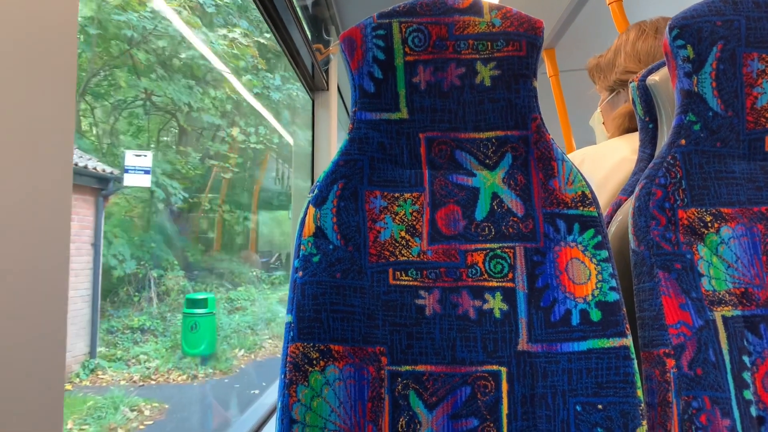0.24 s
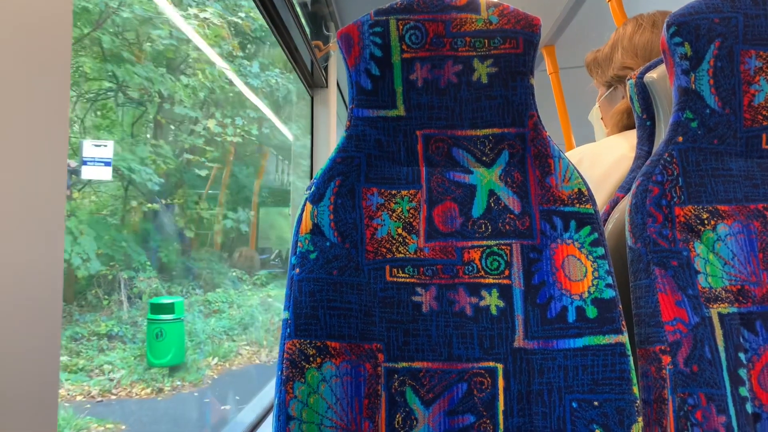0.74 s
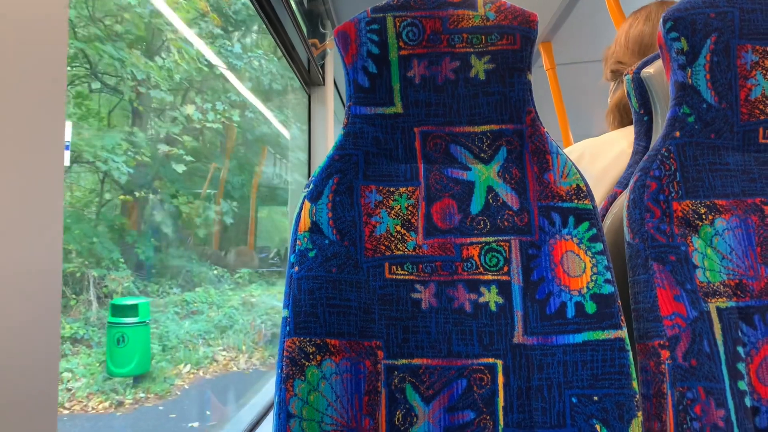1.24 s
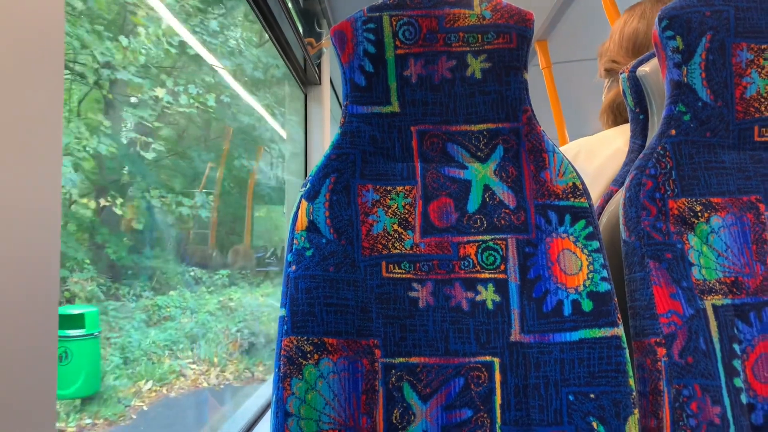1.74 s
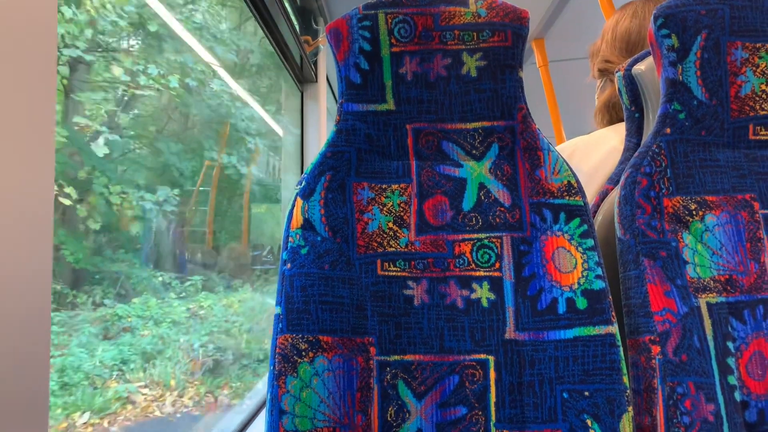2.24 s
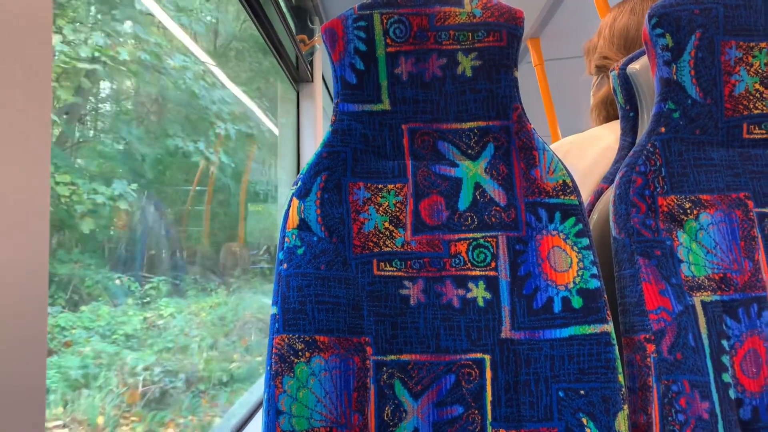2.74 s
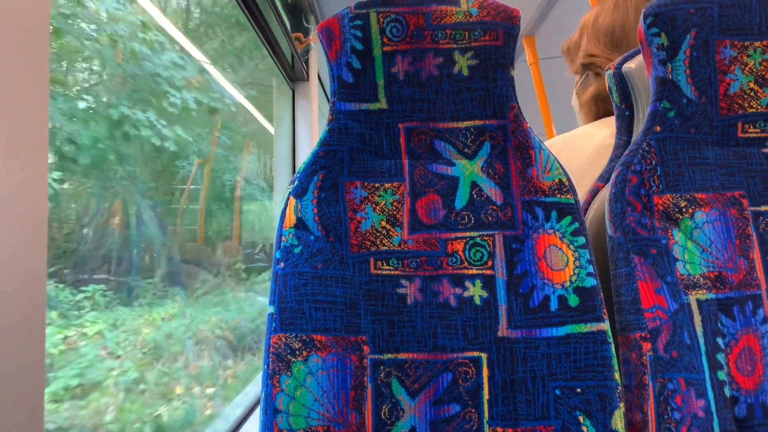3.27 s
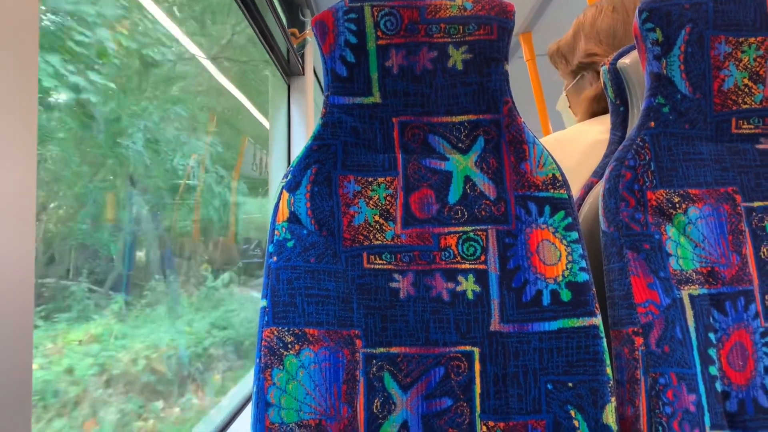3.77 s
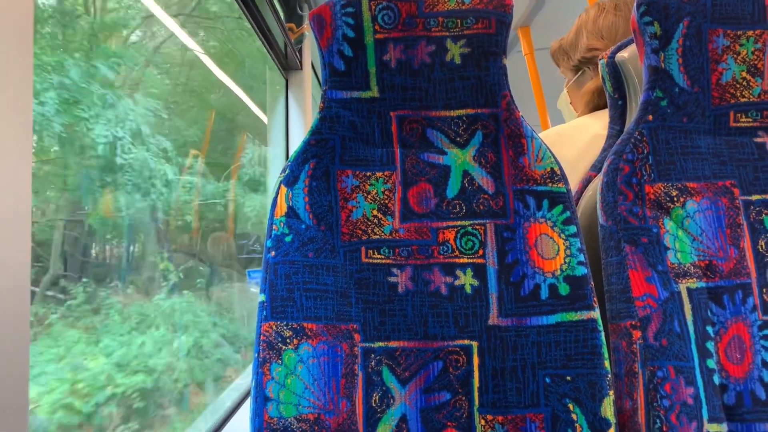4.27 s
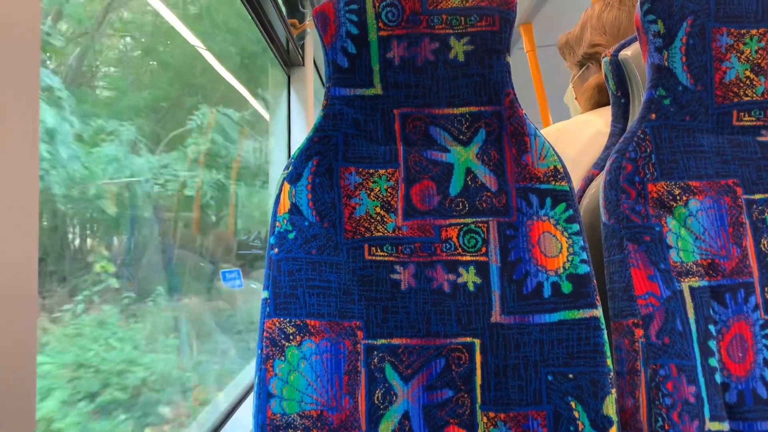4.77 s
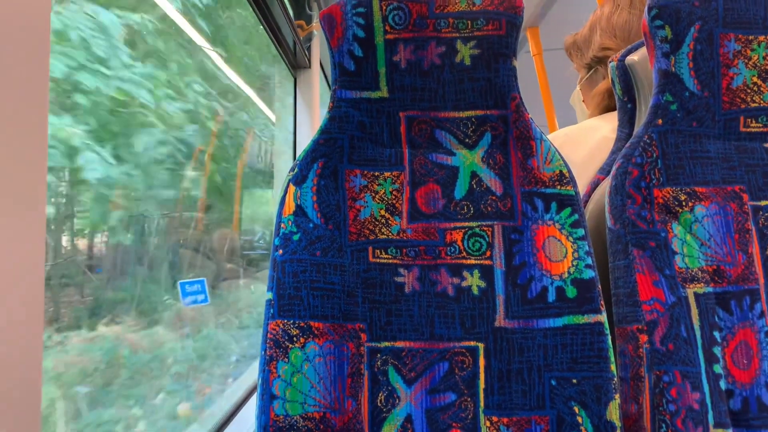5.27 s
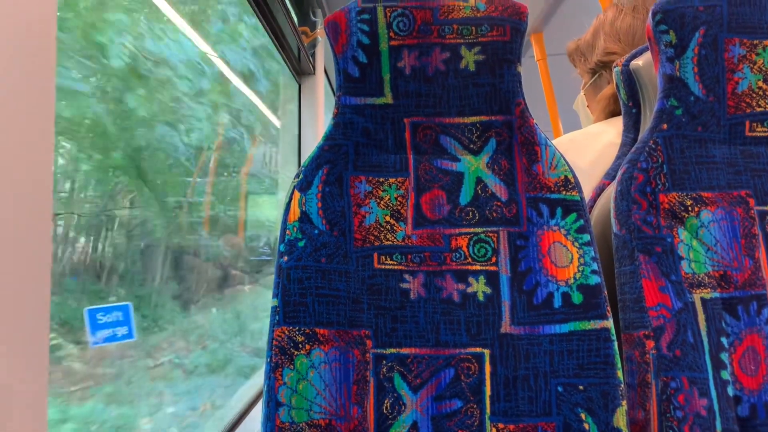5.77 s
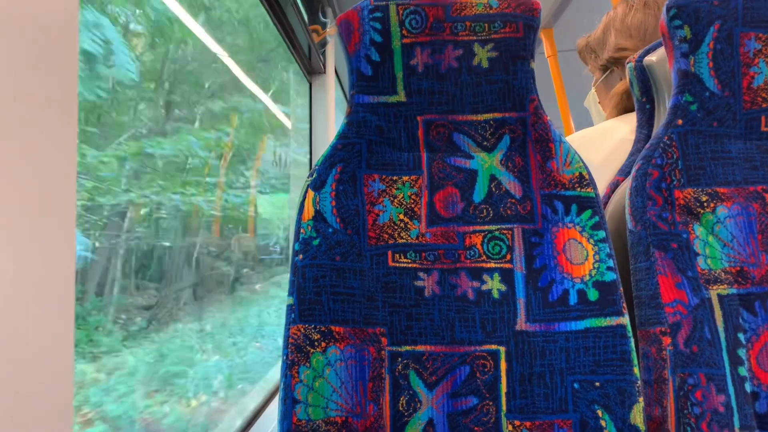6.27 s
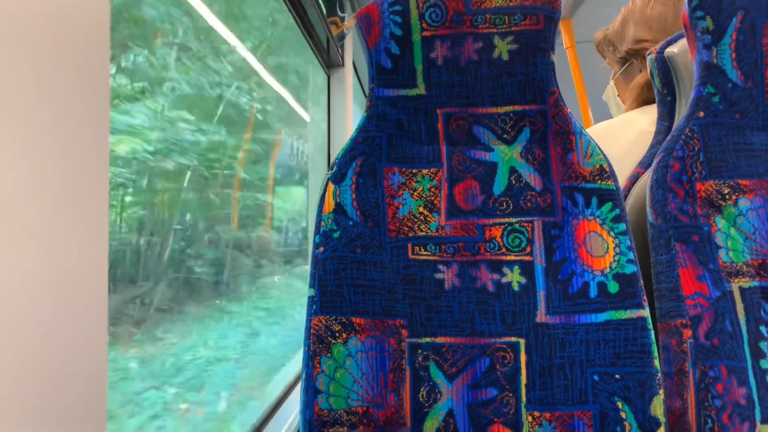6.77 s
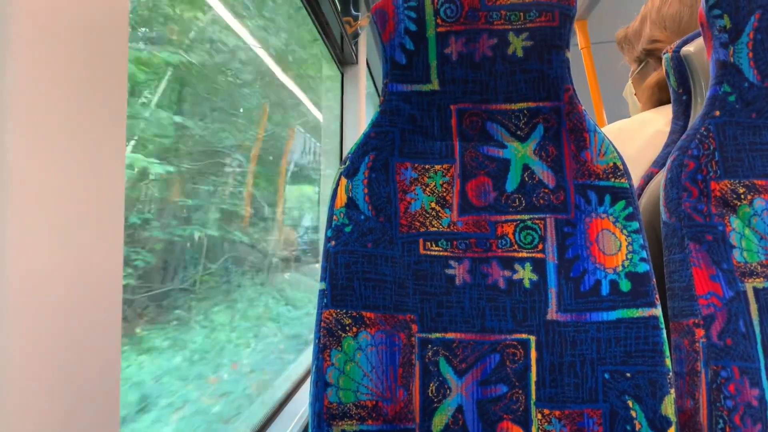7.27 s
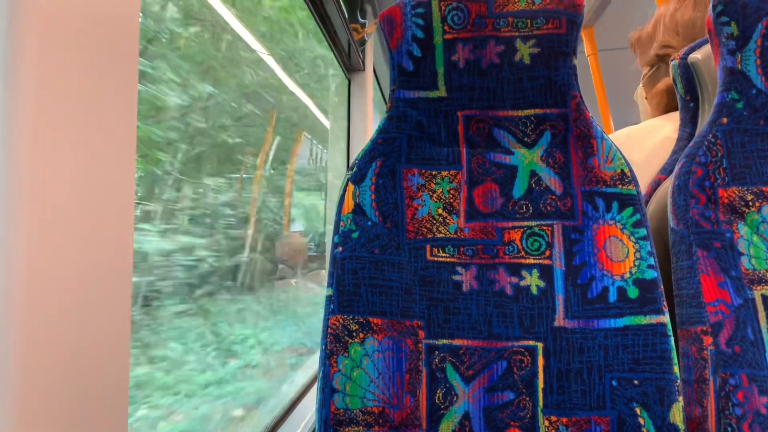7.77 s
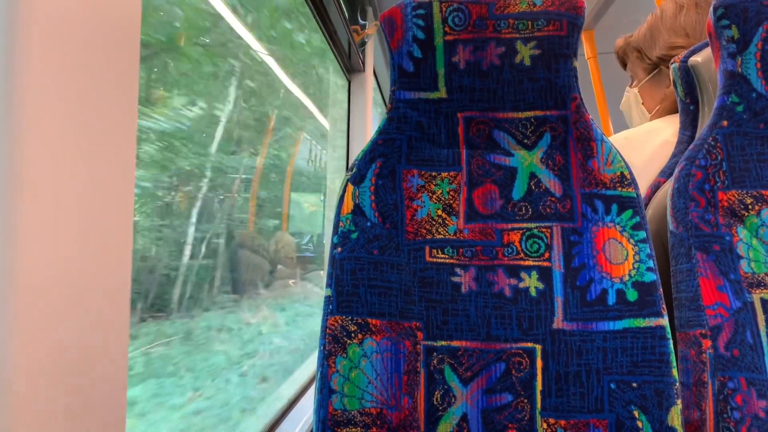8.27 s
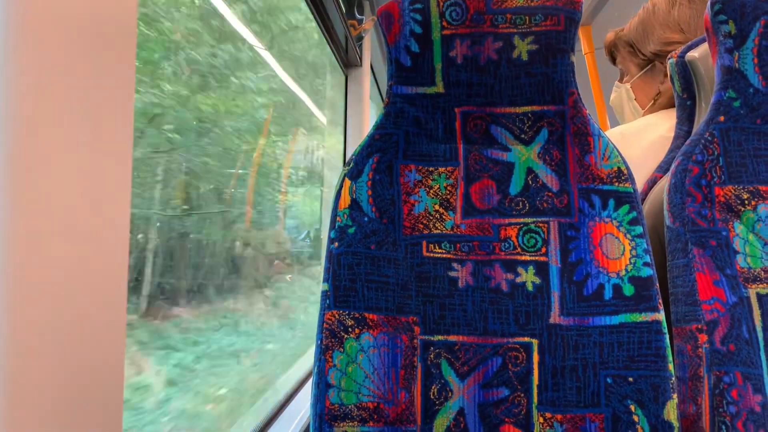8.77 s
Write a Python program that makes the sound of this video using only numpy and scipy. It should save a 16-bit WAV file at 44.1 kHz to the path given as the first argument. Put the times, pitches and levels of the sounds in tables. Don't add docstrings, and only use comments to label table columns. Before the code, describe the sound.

Inside a moving bus, a spaced stereo pair picks up a deep diesel boom and broad body rumble throughout. The engine starts low and slow, dips slightly by 0.8 seconds, then revs climb strongly to about 3.3 as the bus pulls away. From 1.7 to 3.2 a compressor hums harder and puffs bright air. Revs fall at a gear change near 4, rise modestly to 5.3, sag until 6.3, climb to 8.3, then drop before the end. Panels ring, fittings chatter and dry plastic knocks cluster around 0.7-1.4, 2-2.4 and 3-3.8, with the sharpest near 3.6; later ones are sparse. Tyre roar grows until about 5, while axle whine slides upward. Thin whistling leaks pulse with the engine, stronger after 3. A faint steady blower flutters above, and gear whine appears briefly near 3 and around 7-8.3.

```python
import sys
import numpy as np
from scipy import signal
from scipy.fft import rfft, irfft
from scipy.io import wavfile
from scipy.ndimage import uniform_filter1d, map_coordinates

SR = 44100
rng = np.random.default_rng(int(sys.argv[2]) if len(sys.argv) > 2 else 0)


def nominal_scale(level):
    x = np.asarray(level, float) / 20
    return 10 ** x


def store_wav(level_fs):
    pcm = np.round(np.clip(np.atleast_2d(level_fs), -1, 1) * 32767)
    wavfile.write(sys.argv[1], SR, pcm.T.astype(np.int16))


N = 397782
TIME_S = np.arange(N) / SR
HZ = np.arange(N // 2 + 1) * SR / N


def in_time(rows):
    s, *columns = np.transpose(rows)
    return [np.interp(TIME_S, s, c) for c in columns]


def at_hz(points):
    hz, db = np.transpose(points)
    return np.interp(np.log(HZ + 1), np.log(hz), db)


def rms_one(x):
    return x / np.sqrt(np.mean(x ** 2) + 1e-20)


def drift(rate_hz):
    knots = rng.standard_normal(int(N / SR * rate_hz * 2) + 3)
    return map_coordinates(knots, [TIME_S * rate_hz * 2], order=3)


# pitch_hz, likeness (0 to 1)
LIKENESS = [(60, .96), (170, .72), (340, .6), (520, .4), (1000, .15), (1600, .62), (2050, .32), (2400, .6),
            (3100, .3), (4000, .1), (4700, .34), (6300, .2), (7400, .62), (8800, .96)]


def noise(gain, low_hz, high_hz):
    alike = np.clip(at_hz(LIKENESS), 0, 1)
    mid, side = rfft(rng.standard_normal((2, N))) * gain
    pair = np.sqrt(1 + alike) * mid + np.sqrt(1 - alike) * side * [[1], [-1]]
    inside = (HZ > low_hz) & (HZ < high_hz)
    return irfft(pair, N) * N / np.sqrt(np.sum(abs(pair[:, inside]) ** 2))


def peaks(modes, at=HZ):
    power = 0
    for hz, width_hz, db in modes:
        power = power + nominal_scale(db) ** 2 / (1 + (2 * (at - hz) / width_hz) ** 2) ** 2
    return np.sqrt(power)


def tone(cycles, level_db, wobble_db, wander):
    level = np.sqrt(2) * nominal_scale(level_db + wobble_db * drift(7))
    return -level * np.cos(2 * np.pi * cycles + wander * drift(4))


def strikes(cycles, fall):
    size = nominal_scale(0.83 * rng.standard_normal(400))[cycles.astype(int) % 400]
    return size * np.exp(-fall * (cycles % 1))


def pulsing(cycles, depth, steady):
    swell = np.exp(depth * (np.cos(2 * np.pi * cycles) - 1)) * nominal_scale(1.5 * drift(12))
    steady = np.clip(steady, 0, 1)
    return rms_one(swell) * (1 - steady) + steady


# time_s, firings_per_s
SPEED = [(0.0, 23.2), (0.8, 22.1), (1.14, 27.3), (1.86, 44.3), (2.42, 47.5), (2.98, 57.2), (3.33, 58.8),
         (3.93, 46.4), (4.24, 44.7), (4.76, 46.4), (5.29, 50.9), (5.68, 49.1), (6.3, 44.3), (7.51, 52.4),
         (8.29, 56.5), (8.57, 52.2), (8.89, 45.6), (9.02, 45.1)]


def engine_speed():
    return in_time(SPEED)[0]


def revs_octaves(speed):
    return np.log2(speed / 48)


# time_s, effort_db, firing_pulse_sharpness_db, mount_shake_db
THROTTLE = [(0, -3.5, -3.5, -20), (.5, -4.5, -2.5, 4), (1.0, -4.5, 0.5, -1), (1.4, -4, 0, 1.5),
            (1.75, -0.5, -2, -2), (2.2, 2, 0.5, -11), (2.7, -3.5, 0.5, 3.5), (3.1, 2, 2, -5),
            (3.7, 1, -2.5, 0.5), (4.3, 1, -3, -4), (5.0, 0.5, -2, 1.5), (5.5, -0.5, -3, 2.5),
            (6.2, 0, -0.5, -1.5), (6.8, -2, -5.5, 4), (7.3, 0, 6, 2), (7.8, -0.5, 5, -0.5),
            (8.3, 1, -8, -2.5), (9.02, 3, -7, -2)]


def throttle():
    return in_time(THROTTLE)


def layer_db(full_db, effort_share, db_per_octave, speed):
    return full_db + effort_share * throttle()[0] + db_per_octave * revs_octaves(speed)


# pitch_hz, gain_db
CABIN = [(22, -14), (35, -1), (45, 0.5), (58, -1), (70, 1.5), (85, 0.5), (100, 0.5), (170, 0)]


def cabin_db(order_hz):
    hz, db = np.transpose(CABIN)
    return throttle()[0] + np.interp(np.log(order_hz), np.log(hz), db)


# multiple_of_firing, level_db, rise_to_cruise_db_per_octave, sharpness_share, shake_share
MAIN_ORDERS = [
    (1, -19.5, 12, 0.11, -0.29),
    (2, -19.5, 9.5, .01, 1.0),
    (3, -27, -6.5, 1.0, 0.071),
]


def firing_boom(speed, firings):
    _, sharp_db, shake_db = throttle()
    below = np.minimum(revs_octaves(speed), 0)
    slip_db = np.interp(TIME_S, [2.8, 2.95], [-5.5, 0])
    out = 0
    for k, db, rise, sharp_share, shake_share in MAIN_ORDERS:
        level_db = db + cabin_db(k * speed) + rise * below + slip_db * (k == 1)
        level_db = level_db + sharp_share * sharp_db + shake_share * shake_db
        uneven = nominal_scale(1.5 * drift(18))
        out = out + uneven * tone(k * firings, level_db, wobble_db=2.0, wander=0.23)
    return out


# multiple_of_firing,
# level_over_rumble_db
MINOR_ORDERS = [(.5, -4), (1.25, -51), (1.5, -10.5), (1.75, -44), (2.25, 1), (2.5, 1), (2.75, -14.5),
                (3.3, -5.5), (4.0, -11), (4.5, -8.5), (4.75, -2), (5.0, -5.5), (5.5, -8), (6.0, -5),
                (9.0, -3), (10.001, -3.5), (11.0, -4)]
# pitch_hz, width_hz, level_db
BODY = [(72, 41, -6), (145, 65, -6), (260, 41, -5), (488.3, 60, -16)]
# time_s, load_db
IN_GEAR = [(0, -15), (3.3, -5), (4.3, 3.2), (7.3, 2.5), (8.0, -4), (8.7, -3), (9.02, 6)]


def weaker_orders(speed, firings, rumble_db):
    load_db, = in_time(IN_GEAR)
    out = 0
    for k, db in MINOR_ORDERS:
        level_db = db + rumble_db + load_db * (k > 8)
        out = out + peaks(BODY, k * speed) * tone(k * firings, level_db, wobble_db=3.0, wander=0.73)
    return out


COMPRESSOR_ORDER = 1.65


def charging(early_s=0):
    return np.interp(TIME_S, [1.66, 1.7, 3.1 - early_s, 3.3 - early_s], [0, 1, 1, 0])


def compressor_hum(speed, firings):
    below = np.minimum(revs_octaves(speed), 0)
    level_db = -30 + 8.5 * charging(early_s=.3) + cabin_db(COMPRESSOR_ORDER * speed) + 8 * below
    return tone(COMPRESSOR_ORDER * firings, level_db, wobble_db=2.2, wander=0.12)


# pitch_hz, level_db_per_hz
RUMBLE = [(12, -20), (24, -9.5), (55, -5.5), (80, 0), (128, -3.5), (198, -6), (256, -6.5), (279, -14.5),
          (326, -23), (420, -21.5), (550, -29.5), (920, -120)]


def body_rumble(rumble_db):
    return nominal_scale(rumble_db - 2.0 + 1.32 * drift(5.4)) * noise(nominal_scale(at_hz(RUMBLE)), 121, 330)


# pitch_hz, width_hz, level_db
BODY_RING = [(259, 35.6, -19), (485, 52, -36.5), (824, 37, -35.5), (721, 22, -38.5), (1970, 270, -55.5)]


def ringing_panels(speed, rumble_db):
    firings_per_s2 = uniform_filter1d(np.gradient(speed) * SR, size=9000)
    return nominal_scale(rumble_db - 8.0 + 0.0786 * firings_per_s2) * noise(peaks(BODY_RING), 180, 330)


# pitch_hz, level_db_per_hz
CLATTER = [(180, -31), (300, -0.5), (397, -8.5), (499, -8.5), (641, -13), (704, -12), (885, -16),
           (1200, -13), (1410, -15), (1950, -17), (2160, -26), (2400, -20.5), (2690, -27.5), (3600, -32),
           (4680, -71), (7920, -120)]


def cabin_clatter(clatter_db, combustion):
    level = nominal_scale(clatter_db - 3.0 + 1.58 * drift(9))
    return level * combustion * noise(nominal_scale(at_hz(CLATTER)), 240, 3500)


# pitch_hz, level_db_per_hz
HISS = [(2500, 4), (3200, -0.5), (5000, -4.5), (7300, -9), (9000, -13), (11000, -18.5), (14000, -32.5),
        (16000, -24)]


def engine_hiss(hiss_db, combustion):
    return nominal_scale(hiss_db - 1.0 + 0.97 * drift(14)) * combustion * noise(nominal_scale(at_hz(HISS)), 2730, 6800)


def tyre_roar():
    pace = np.clip(TIME_S / 5.2, .05, 1)
    floor_pan = [(556, 400, -38.5)]  # pitch_hz, width_hz, level_db
    return nominal_scale(-38.5 + 5.5 * np.log2(pace) + 1.0 * drift(5)) * noise(peaks(floor_pan), 300, 1200)


# pitch_hz, width_hz, level_db
AXLE_RING = [(428, 14, -48), (470, 14, -38), (530, 24, -34), (584, 40, -39.5), (705, 50, -49)]


def axle_whine():
    pitch_hz = 410 + 73 * (TIME_S - 4.6)
    return peaks(AXLE_RING, pitch_hz) * tone(np.cumsum(pitch_hz) / SR, 3 * drift(25), wobble_db=1.5, wander=2.2)


# time_s, pitch_hz, level_db
FAN = [(0, 2442, -54), (3.0, 2442, -52), (4.95, 2446, -49.5), (5.2, 2465, -56), (6.5, 2468, -58),
       (8.3, 2472, -57), (9.02, 2470, -62)]


def blower():
    pitch_hz, db = in_time(FAN)
    cycles = np.cumsum(pitch_hz + 16 * drift(35)) / SR
    return tone(cycles, db + 4 * drift(40), wobble_db=1.1, wander=.8)


# time_s, level_db
BOOST = [(0.0, -67), (0.38, -80), (1.81, -58), (1.93, -60), (2.26, -52.5), (2.86, -49.5), (3.94, -57.5),
         (4.57, -57.5), (5.12, -50.5), (5.75, -51), (6.71, -56.5), (7.56, -55.5), (7.84, -52.5),
         (9.02, -55)]


def over_pressure_db():
    return in_time(BOOST)[0] + 55


# pitch_hz, level_db_per_hz
LOW_LEAK = [(7500, -19.5), (8300, -13), (9500, -9), (11500, 2.5), (12800, -9), (13500, -22)]
# pitch_hz, width_hz, level_db
WHISTLES = [(8730, 40, -4), (9440, 80, -1), (9860, 40, 3), (10300, 45, 11), (10590, 60, 5), (11400, 70, 5)]


def low_leak(firings, over_db):
    level_db = over_db - 55 + 1.5 * np.minimum(over_db, 0)
    steady = np.clip(.68 + .02 * (over_db - 5), .1, 1)
    whistling = nominal_scale(at_hz(LOW_LEAK)) + peaks(WHISTLES)
    air = pulsing(firings / 4 - 3 / 4, .9, steady) * noise(whistling, 8300, 10900)
    return nominal_scale(level_db + 0.4) * (1 - charging()) * air


# pitch_hz, level_db_per_hz
HIGH_LEAK = [(11500, -30), (12400, -3), (13000, -1), (14000, -3), (14700, -1), (15250, -6), (15600, -19)]


def high_leak(firings, over_db):
    level_db = -54.5 + .9 * (over_db - 1) + .3 * (TIME_S - 4.5)
    depth = np.clip(.8 - .06 * over_db, .45, .85)
    air = pulsing(firings / 4 - 9 / 32, depth, .42) * noise(nominal_scale(at_hz(HIGH_LEAK)), 12400, 15500)
    return nominal_scale(level_db) * (1 - .6 * charging()) * air


def rattles(clatter_db):
    jolts_per_s, t60_s, count = 420, .1, 48
    pitches_hz = np.geomspace(600, 6500, count) * rng.uniform(.97, 1.03, count)
    jolts = (rng.random(N) < jolts_per_s / SR) * nominal_scale(np.clip(2 * rng.standard_normal(N), -3, 3))
    dealt = rng.integers(0, count, N)
    sides_db = rng.uniform(-6, 6, count)
    decay, soft = nominal_scale(-60 / (t60_s * SR)), np.hanning(600) / 300
    shaking = drift(9)
    out = np.zeros((2, N))
    for k, hz in enumerate(pitches_hz):
        hits = signal.oaconvolve(jolts * (dealt == k), soft)[:N]
        swell = signal.lfilter([1], [1, -decay], hits + 1e-18)
        colour_db = np.interp(np.log(hz), np.log([600, 1200, 2400, 3600, 6500]), [-1.5, -5, -10, -14.5, -26])
        sway_s = .0004 * np.roll(shaking, k * 7001)
        ring = swell * np.sin(2 * np.pi * hz * (TIME_S + sway_s))
        out += nominal_scale(colour_db + sides_db[k] * np.array([[1], [-1]])) * ring
    return nominal_scale(clatter_db - 9.5) * rms_one(out)


# time_s, peak_db, low_part_db
KNOCKS = [(0.6853, -40.5, 5), (0.7205, -40.5, 4.5), (0.815, -41.5, 9.5), (1.1794, -51.5, 14),
          (1.2331, -41, 6), (1.2753, -42.5, 8), (1.3374, -36.5, 4), (1.4396, -31, 3.5), (2.0703, -36, -6),
          (2.1194, -38.5, 7), (2.431, -38.5, 7), (3.0152, -38.5, 8), (3.045, -47, 14), (3.072, -49.5, 11.5),
          (3.1145, -36.5, 9), (3.5074, -44.5, 13), (3.5779, -28, -3), (3.676, -33, 4), (3.7694, -29.5, -1),
          (4.6088, -44, 8), (5.2131, -40.5, 8), (5.787, -46.5, 14), (6.947, -39, 1), (7.1536, -42, 11.5),
          (7.681, -49, 19.5), (8.2224, -42, 6)]
# pitch_hz, level_db, t60_s
KNOCK_MODES = [(1584, 0.5, 0.13), (1930, -1, 0.079), (3430, -15, 0.067), (6930, 2, 0.048),
               (7430, -13, 0.026)]


def knocks():
    at_s, peak_db, low_db = np.transpose(KNOCKS)
    at = (at_s * SR).astype(int)
    chance_db = rng.normal(0, 2.0, (len(at), len(KNOCK_MODES)))
    rings = np.zeros(N)
    for k, (hz, db, t60_s) in enumerate(KNOCK_MODES):
        clicks = np.zeros(N)
        clicks[at] = nominal_scale(peak_db + db + chance_db[:, k] + (low_db - 5.5 if hz < 2500 else -3))
        r, w = nominal_scale(-60 / (t60_s * SR)), 2 * np.pi * hz / SR
        rings += signal.lfilter([0, np.sin(w)], [1, -2 * r * np.cos(w), r * r], clicks + 1e-18)
    out = rings * nominal_scale(np.array([[0], [-12]]))
    # pitch_hz, level_db_per_hz
    crack = [(2200, 3), (3000, 12.0), (6800, 13.0), (10000, -1), (15500, -26)]
    thud = [(400, -7), (800, 2.0), (1500, 10.0), (2300, 0), (3200, -11.5)]
    bursts = [(crack, peak_db - 13, .22, (4000, 9000)),
              (thud, peak_db + low_db - 5.5, .18, (1200, 2200))]
    for colour, db, t60_s, band_hz in bursts:
        clicks = np.zeros(N)
        clicks[at] = nominal_scale(db)
        tail = signal.lfilter([1], [1, -nominal_scale(-60 / (t60_s * SR))], clicks + 1e-18)
        out = out + tail * noise(nominal_scale(at_hz(colour)), *band_hz)
    return out


# pitch_hz, level_db_per_hz
PUMP_PUFF = [(5000, -8), (7500, 0), (8900, 2.5), (10100, 4), (11300, 7.5), (12500, 0), (15500, -20)]
# time_s, trail_turns
CHARGING = [(1.68, .45), (1.82, .62), (1.95, .85), (2.05, 1.0), (2.2, 1.1), (3.12, 1.1)]


def compressor_puffs(firings, over_db):
    trail, = in_time(CHARGING)
    puffs = uniform_filter1d(strikes(firings * COMPRESSOR_ORDER / 3 - trail, fall=2.0), size=150)
    air = (1.85 * puffs + 0.37) * noise(nominal_scale(at_hz(PUMP_PUFF)), 10530, 11000)
    return nominal_scale(-56.5 + 0.69 * (over_db - 6.5)) * charging() * air


# time_s, teeth_per_firing, level_db
GEAR = [
    [(2.8, 39.3, -66), (3.05, 39.3, -54), (3.15, 39.3, -64)],
    [(6.9, 39.4, -60), (7.4, 39.4, -56), (8.15, 39.2, -53), (8.35, 39.2, -68)],
]


def timing_gears(speed):
    out = 0
    for rows in GEAR:
        teeth, db = in_time(rows)
        start_s, end_s = rows[0][0], rows[-1][0]
        on = np.interp(TIME_S, [start_s - .2, start_s, end_s, end_s + 0.29], [0, 1, 1, 0])
        out = out + on * tone(np.cumsum(teeth * speed) / SR, db, wobble_db=3.5, wander=2.2)
    return out


def scene():
    speed = engine_speed()
    firings = np.cumsum(speed) / SR
    rumble_db = layer_db(-23.5, 0.51, 2.1, speed)
    clatter_db = layer_db(-31.5, 0.19, 2.5, speed)
    hiss_db = layer_db(-50, 0.1, 3, speed)
    combustion = 1 + 0.061 * strikes(firings, fall=16.0)
    over_db = over_pressure_db()

    engine = firing_boom(speed, firings) + weaker_orders(speed, firings, rumble_db)
    engine = engine + compressor_hum(speed, firings)
    body = body_rumble(rumble_db) + ringing_panels(speed, rumble_db) + tyre_roar()
    bright = cabin_clatter(clatter_db, combustion) + engine_hiss(hiss_db, combustion)
    whines = axle_whine() + blower() + timing_gears(speed)
    air = low_leak(firings, over_db) + high_leak(firings, over_db) + compressor_puffs(firings, over_db)
    return engine + whines + body + bright + air + rattles(clatter_db) + knocks()


def roll_off(x):
    return signal.sosfilt(signal.butter(12, 15830, fs=SR, output="sos"), x)


# pitch_hz, gain_db
MICROPHONE = [(10000, 2.5), (15500, -3), (15800, -45)]
# pitch_hz, left_minus_right_db
LEAN = [(60, -0.5), (110, 0.0), (200, 2.0), (380, 0.5), (700, 1.5), (1290, 0.5), (2380, 0.5), (4400, -1.0),
        (8120, -0.5), (15000, 0.0)]
# pitch_hz, left_lead_rad
LEFT_LEAD = [(0, 0), (860, 1.3), (1600, 3.8), (2400, 7.1), (4800, 12.9), (5700, 16.7), (7400, 15.5),
             (8850, 12.75), (9650, 12.4), (11150, 9.6), (12200, 9.3), (13300, 6.45), (14400, 6.15),
             (15900, 3.4)]


def record(dry):
    dry = dry + (dry[:, :1] - dry[:, -1:]) * np.r_[np.zeros(N - 500), np.hanning(1000)[:500]]
    lean = nominal_scale(at_hz(LEAN) / 2)
    late = np.exp(-1j * np.interp(HZ, *np.transpose(LEFT_LEAD)))
    pair = irfft(rfft(dry) * nominal_scale(at_hz(MICROPHONE)) * [lean, late / lean], N)
    rounded = 1.12 * np.tanh(pair / 1.08)
    return roll_off(rounded)


dry = scene()
out = record(dry)
store_wav(out)
```